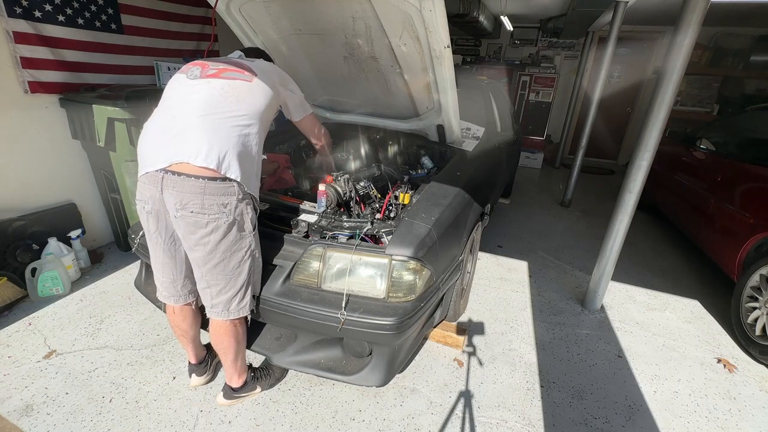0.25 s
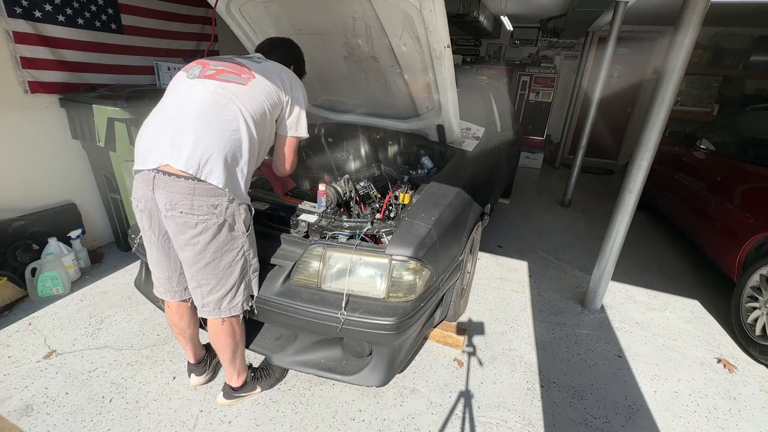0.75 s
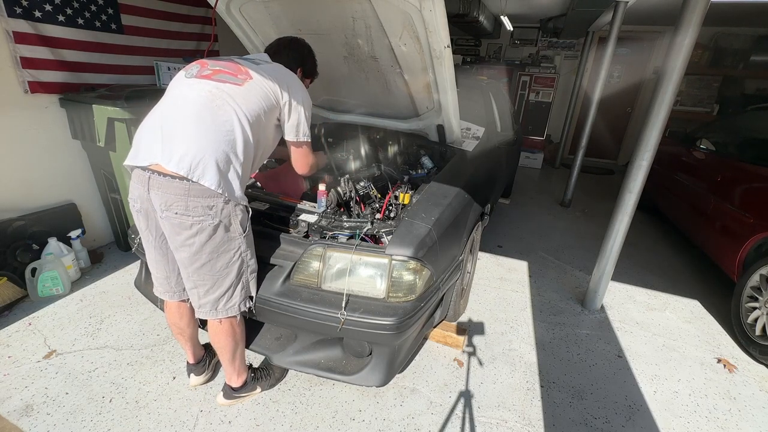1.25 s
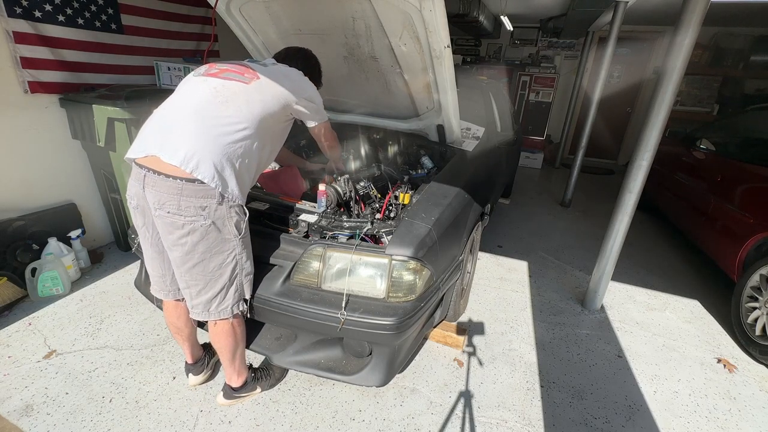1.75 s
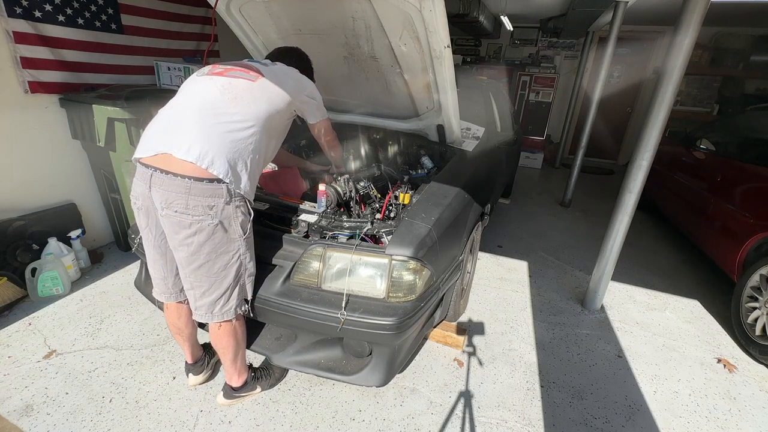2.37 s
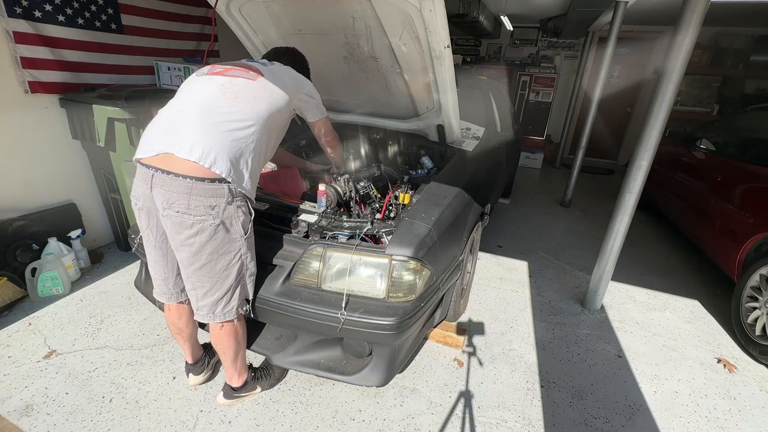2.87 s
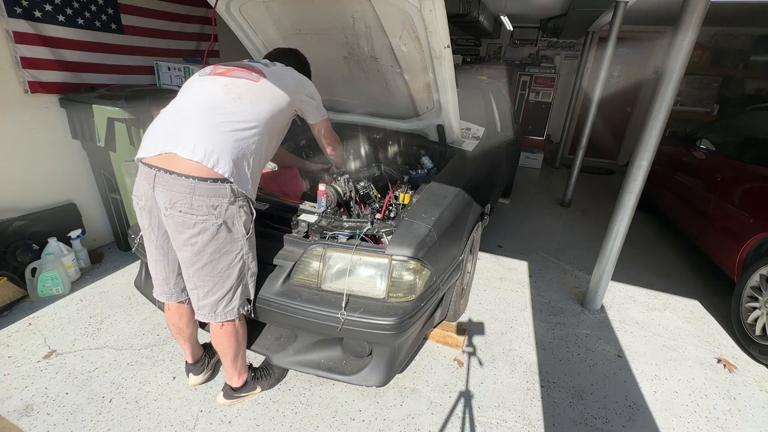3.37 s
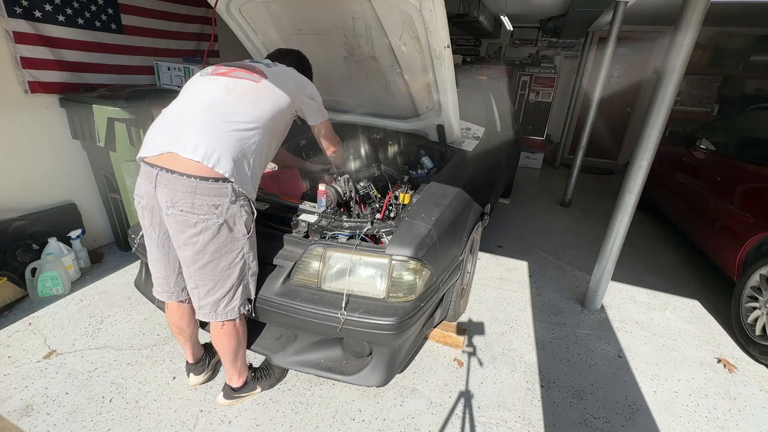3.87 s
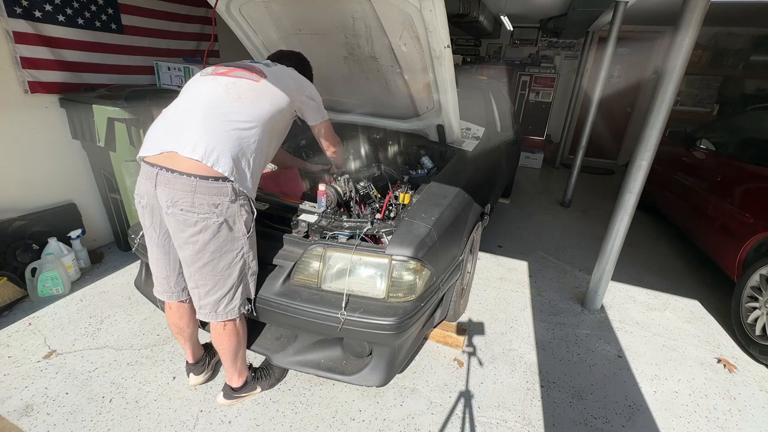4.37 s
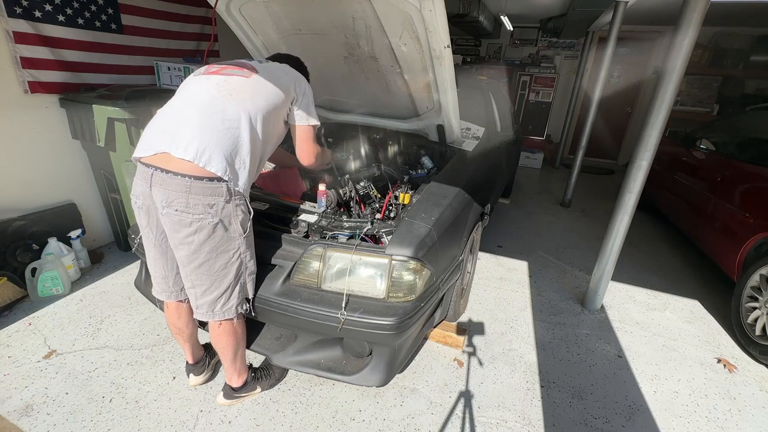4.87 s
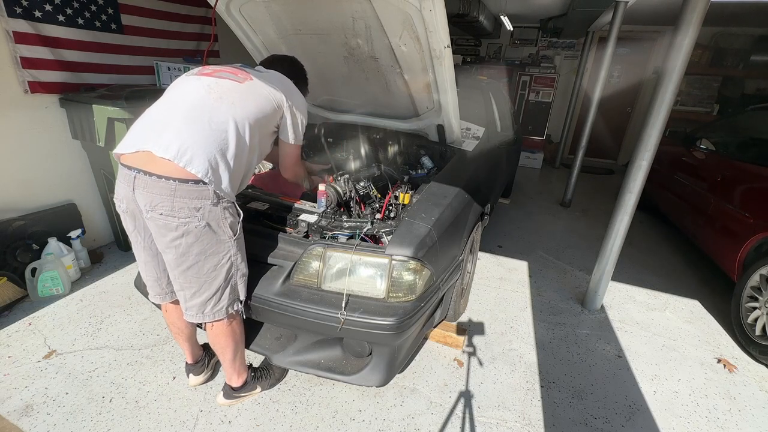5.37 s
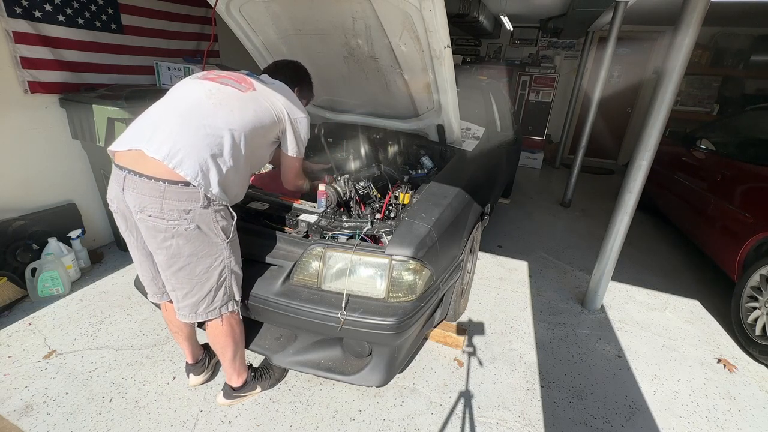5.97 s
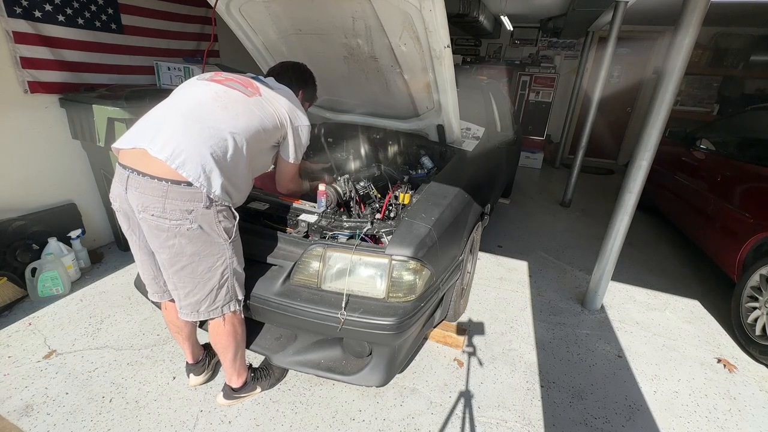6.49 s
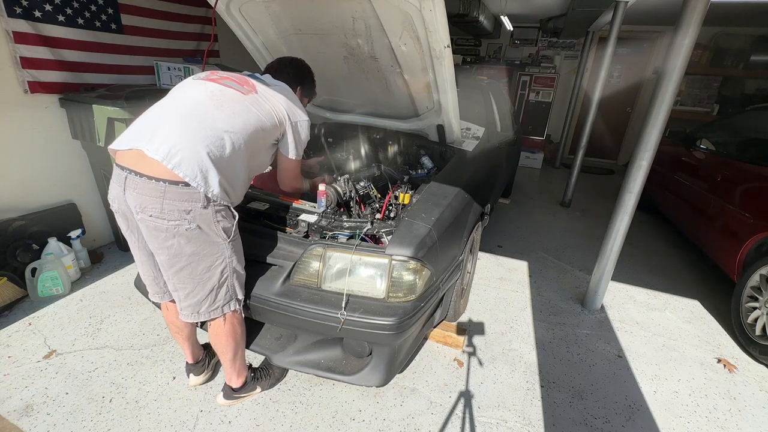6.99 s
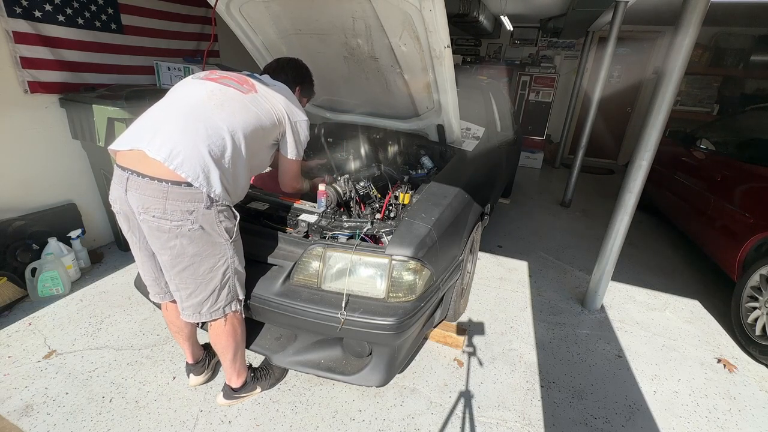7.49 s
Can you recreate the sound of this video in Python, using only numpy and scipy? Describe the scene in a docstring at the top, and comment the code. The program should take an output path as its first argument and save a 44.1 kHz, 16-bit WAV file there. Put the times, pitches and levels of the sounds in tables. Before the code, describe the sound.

A stereo microphone near an open engine bay picks up very quiet handling: small knocks, one brief rub, two dull thuds and a crisp snap. Faint whistling and buzzy birds echo outside over traffic rumble and high hiss, the hiss stronger on the left. After a lull, metal abruptly scrapes and bangs, ringing a housing and shaft, far louder than everything before, followed by low body boom and fading garage reverberation.

```python
"""First you hear town rumble, an insect-like hiss and far birds in echoes, from an open engine bay at a garage door.
A metal part is worked loose: small knocks, a rub, thuds on a fender and a snap; then it scrapes free and clatters.
Scrape and blows ring a metal housing and a steel shaft, and the car body booms along.
Knocks and snap are short puffs of noise, thuds are low rings, and the rub is a squeak shaken by noise.
Birds are gliding tones with echoes; rumble and hiss are shaped noise."""
import sys
import numpy as np
from scipy import signal
from scipy.fft import rfft, irfft, next_fast_len
from scipy.io import wavfile
from scipy.ndimage import uniform_filter1d, map_coordinates

SR = 44100
rng = np.random.default_rng(int(sys.argv[2]) if len(sys.argv) > 2 else 0)


def boost(x):
    """Linear amplitude factor 10**(x/20) for a level x in decibels (scalar or array-like)."""
    u = np.asarray(x, float) / 20
    return 10 ** u


def generate_wav(signal):
    """Clip the signal to [-1, 1] and save it as 16-bit WAV at the path in sys.argv[1]."""
    frames = np.transpose(np.atleast_2d(signal))
    scaled = np.clip(frames, -1, 1) * 32767
    pcm = np.round(scaled).astype(np.int16)
    wavfile.write(sys.argv[1], SR, pcm)


N = 341334  # length in samples


def unit(x):
    """Scales a sound to rms 1."""
    return x / np.sqrt(np.mean(x ** 2) + 1e-20)


def along(points, hz):
    """Reads a (pitch_hz, value) table at any pitch, on a log pitch axis."""
    point_hz, value = np.transpose(points)
    return np.interp(np.log(hz + 1), np.log(point_hz + 1), value)


def curves(rows):
    """Draws each column after the time as a curve over the scene, plus a gate open within the rows."""
    start_s, *columns = np.transpose(rows)
    t = np.arange(N) / SR
    gate = (t > start_s[0]) & (t < start_s[-1])
    return [np.interp(t, start_s, column) for column in columns] + [gate]


def wobble(rate):
    """A smooth random curve with this many random knots a second."""
    knots = rng.standard_normal(int(N * rate / SR) + 4)
    return map_coordinates(knots, [np.arange(N) * rate / SR])


def filtered(x, response):
    """Colours a sound by a response that is a function of frequency."""
    size = next_fast_len(x.shape[-1] + 8192)
    spectrum = rfft(x, size) * response(np.fft.rfftfreq(size, 1 / SR))
    return irfft(spectrum, size)[..., :x.shape[-1]]


def ringing(modes, damping):
    """Response of an object with several ringing pitches; damping widens each one, so it dies sooner."""
    def response(f):
        total = 0
        for k, (hz, width_hz, level_db) in enumerate(modes):
            loss = 1j * f * width_hz * damping
            total = total + (-1) ** k * boost(level_db) * loss / (hz * hz - f * f + loss)
        return total
    return response


def echo(x, decay, stretch):
    """Many blurred reflections per ear: noise tails that die at a speed set by pitch."""
    x = np.broadcast_to(x, (2, N))
    out = np.zeros((2, N + 2 * SR))
    step = SR // 4  # a fresh random tail every quarter second
    for i in range(0, N, step):
        noise = rng.standard_normal((2, int(stretch * SR) + 512))
        hz, t, z = signal.stft(noise, SR, nperseg=128)
        t60_s = stretch * along(decay, hz)[:, None]
        tail = signal.istft(z * boost(-60 * t / t60_s), SR, nperseg=128)[1]
        wet = signal.fftconvolve(x[:, i:i + step], tail / np.linalg.norm(tail[0]), axes=1)
        out[:, i:i + wet.shape[1]] += wet
    return out[:, :N]


# How the part scrapes free: start_s, level_db, brightness_db
SCRAPE_PATH = [(6.69, -65.5, 5.5), (6.714, -31, -14), (6.764, -24, -7.5), (6.798, -15.5, -4),
               (6.856, -17, -17.5), (6.866, -8.5, -9.5), (6.886, -10.5, -8.5), (6.898, -11.5, -13),
               (7.06, -52, -19)]
# Ringing pitches of the cast housing, widths before damping: pitch_hz, width_hz, level_db
HOUSING_MODES = [(480, 64, -9.5), (565, 52, -5.5), (660, 50, -4.5), (892, 100, -12.5), (1090, 120, -7.5),
                 (1198, 51, -11), (1230, 80.7, -7.5), (1418, 68, -2), (1450, 44, -1.5), (1510, 61, -3.5),
                 (1640, 46, -1), (1776, 120, -6.5), (1950, 63, -3.5), (2105, 81, -8.5), (2330, 170, -10.5),
                 (2520, 100, -12.5), (2600, 37, -6.5), (2810, 150, -15.5)]


def scrape():
    """Rubbing metal sticks and slips: random tiny shocks ring the housing and make bright contact noise."""
    level_db, bright_db, on = curves(SCRAPE_PATH)
    shocks = (rng.random(N) < .03) * rng.standard_normal(N)
    slips = unit(shocks * boost(3.7 * wobble(150))) * on
    housing = filtered(slips * boost(level_db + 6.5), ringing(HOUSING_MODES, damping=1.07))
    contact = slips * boost(level_db + bright_db + 9.5)
    return housing, contact


# Blows of the freed part; aim is the pitch struck hardest: start_s, level_db, brightness_db, aim_hz
BLOWS = [(6.705, -46, -16, 1280), (6.709, -41, -18, 1268), (6.72, -35, -15, 1400),
         (6.744, -34.5, -9.5, 1486), (6.753, -31, -2.5, 2024), (6.779, -14.5, -15.5, 1917),
         (6.791, -11, -17, 2400), (6.795, -6.5, -21, 1500), (6.805, -9.5, -7.5, 1480),
         (6.835, -22, -15, 1460), (6.845, -24, -11.5, 1470), (6.864, -2.5, -17.5, 1290),
         (6.875, -5, -13, 1450), (6.882, -7.5, -21, 1450), (6.89, -15, -23, 1403), (6.92, -19.5, -11, 1486),
         (6.932, -18.5, -15, 1640), (6.942, -19.5, -20.5, 1640), (7.082, -25, -37, 1550),
         (7.084, -24, -39, 1800), (7.091, -26, -34, 1700), (7.097, -22, -36.5, 1580)]


def blows():
    """Each blow rings the housing pitches near its aim, with a burst of noise; duller contacts last longer."""
    contact_s, softens, side_scatter_db = .00018, .4, 2.6  # contact time at brightness 0 dB
    housing, contact = np.zeros((2, N)), np.zeros((2, N))
    t = np.arange(SR // 8) / SR
    hz, width_hz, mode_db = np.transpose(HOUSING_MODES)[:, :, None]
    for start_s, level_db, bright_db, aim_hz in BLOWS:
        i = round(start_s * SR)
        # each blow leans to the left or right by chance
        sides = boost(level_db + rng.normal(0, side_scatter_db) * np.array([[.5], [-.5]]))
        off_aim_db = 12 * np.minimum(np.log2(hz / aim_hz) ** 2, 3.5)
        struck = boost(mode_db + rng.normal(0, 2.2, hz.shape) - off_aim_db)
        tones = np.sin(2 * np.pi * hz * t + rng.normal(0, 0.82, hz.shape))
        ring = (struck * np.exp(-np.pi * 1.4 * width_hz * t) * tones).sum(0)
        rise = 1 - np.exp(-(t / (contact_s * boost(-softens * bright_db))) ** 2)
        housing[:, i:i + len(t)] += sides * ring * rise
        burst = boost(bright_db + 15.0 - 60 * t / 0.025) * rng.standard_normal(len(t))
        contact[:, i:i + len(t)] += sides * burst
    return housing, contact


# Ringing pitches of the steel shaft and clamp, widths before damping: pitch_hz, width_hz, level_db
SHAFT_MODES = [(4450, 59, -8), (5330, 73, 6), (6600, 19, -7.5), (7400, 24, 4), (7980, 220, -12.5),
               (9350, 32, 5)]
# Tone of the bare contact noise: pitch_hz, level_db
CONTACT_TONE = [(1500, -6.5), (3000, -7), (5000, -7.5), (9500, -7), (12500, -4.5), (14500, -5),
                (16000, -10.5)]


def clatter():
    """The scrape and blows together: housing ring, bare contact noise and the shaft that noise sets ringing."""
    scrape_housing, scrape_contact = scrape()
    blow_housing, blow_contact = blows()
    # a small part radiates little bass
    housing = filtered(scrape_housing + blow_housing, lambda f: f ** 4 / (f ** 4 + 350 ** 4))
    shaft = ringing(SHAFT_MODES, damping=4.5)
    contact = filtered(scrape_contact + blow_contact,
                       lambda f: boost(along(CONTACT_TONE, f) - 2.5) + .5 * shaft(f))
    return housing + contact


# Low resonances of the car body, widths before damping: pitch_hz, width_hz, level_db
BODY_PANELS = [(40, 12, 0.5), (71, 12.6, 1.5), (130, 16, -3.5), (200, 7.3, -11), (249, 22, -2),
               (330, 14, -7.5), (439, 35, -5)]


def panels(shocks):
    """The car body takes the shocks and booms on, alike in both ears."""
    return filtered(shocks, ringing(BODY_PANELS, damping=0.68))


def boom():
    """The scraping shakes the car body with noise, and the shaking dies away slowly."""
    boom_db, boom_t60_s = 2.5, 0.79
    level_db, _, on = curves(SCRAPE_PATH)
    push = on * boost(level_db)
    fade = boost(-60 / (boom_t60_s * SR))
    shudder = push + 0.39 * signal.lfilter([1 - fade], [1, -fade], push)
    return panels(unit(rng.standard_normal(N)) * shudder * boost(boom_db))


# A hand drops on the hollow fender: start_s, level_db
HAND_DROPS = [(1.9, -37.5), (4.917, -38.5)]
# Ringing pitches of the fender; t60 is the time to fall 60 dB: pitch_hz, level_db, t60_s
FENDER_MODES = [(136.3, -3.5, .4), (169.7, -6, 0.31), (263, -7, 0.27), (344, -10.5, 0.14), (458, -10, .25),
                (517, -7, .2), (676, -6, 0.26), (836, -17, .15), (1060, -2, .076)]


def thuds():
    """The fender rings low for a moment under a dull puff of contact noise."""
    ring_db, puff_db = -8, -7
    out, t = np.zeros(N), np.arange(SR // 3) / SR
    hz, mode_db, t60_s = np.transpose(FENDER_MODES)[:, :, None]
    dull = lambda f: f / (f + 150) / (1 + (f / 1100) ** 4)
    for start_s, level_db in HAND_DROPS:
        i = round(start_s * SR)
        fading = boost(mode_db + rng.normal(0, 1.1, hz.shape) - 60 * t / t60_s)
        ring = (fading * np.sin(2 * np.pi * hz * t)).sum(0)
        puff = unit(filtered(rng.standard_normal(len(t)), dull)) * boost(-60 * t / 0.16)
        rise = 1 - np.exp(-t / 0.0017)
        out[i:i + len(t)] += boost(level_db) * (boost(ring_db) * ring + boost(puff_db) * puff) * rise
    return out


def puffs(contacts):
    """Each contact is a dying puff of noise around its own pitch; higher bands rise and die sooner."""
    out, t = np.zeros(N), np.arange(SR // 3) / SR
    for start_s, level_db, hz, spread, t60_s in contacts:
        i = round(start_s * SR)
        octave = np.array([[-1.5], [-.5], [.5], [1.5]]) * spread  # four bands around the pitch

        def bands(f):
            distance = np.log2((f + 1) / hz) - octave
            return np.exp(-.5 * octave ** 2 / spread ** 2 - distance ** 2 / (0.71 * spread) ** 2)
        puff = unit(filtered(rng.standard_normal(len(t)), bands))
        puff = puff * boost(-60 * t / (t60_s * 2 ** (-.55 * octave)))
        puff = puff * (1 - np.exp(-t * hz * 2 ** octave / 1.4))  # rises over a few cycles
        out[i:i + len(t)] += boost(level_db) * puff.sum(0)
    return out


# Small knocks and ticks of handling: start_s, level_db, pitch_hz, spread_octaves
HANDLING = [(0.237, -54, 8900, 1.1), (0.796, -59, 6750, 0.23), (1.48, -47, 2220, 0.29),
            (1.484, -55.5, 1930, 1.4), (1.553, -59, 1090, 1.5), (3.668, -60.5, 1020, 0.89),
            (3.969, -64, 696, 0.46), (3.99, -55.5, 330, .64), (4.074, -52.5, 1160, 0.36),
            (4.161, -64, 1080, 0.97), (4.27, -65, 1500, .88), (4.305, -58.5, 406, 1.2),
            (4.563, -54.5, 750, 1.26), (4.588, -57.5, 5950, 1.9), (4.805, -53, 700, 0.76),
            (5.682, -58, 1270, 0.34), (6.609, -62, 398, 0.53)]


def knocks():
    """A knock with a broader spread of pitches shakes more parts and lasts longer."""
    t60_s_per_octave = 0.17  # at the centre pitch
    return puffs([(*knock, t60_s_per_octave * knock[3]) for knock in HANDLING])


# A fastener snaps open: start_s, level_db, pitch_hz, spread_octaves
SNAP_CONTACTS = [(5.1526, -36, 1200, 1.4), (5.1534, -33, 2780, 1.23), (5.1584, -32, 3970, 0.35)]


def snap():
    """A few very short contacts in quick succession are heard as one snap."""
    return puffs([(*contact, 0.019) for contact in SNAP_CONTACTS])  # t60 in s at the centre pitch


# A hose or sleeve rubs along the bay: start_s, level_db, squeak_hz
RUB_PATH = [(.62, -84, 880), (.7, -62, 860), (.8, -58, 850), (.83, -51, 790), (.89, -48, 710),
            (.94, -53, 680), (1.07, -62, 720), (1.18, -85, 690)]


def rub():
    """Friction: an unsteady squeak that mostly falls, with a fixed noise band at 500 Hz and one at 1500 Hz."""
    low_db, hiss_peak_db, hiss_follows = -6.5, -54.5, 0.42  # the hiss swings less than the squeak
    level_db, hz, on = curves(RUB_PATH)
    t = np.arange(N) / SR

    def narrow(width_hz):
        return unit(filtered(rng.standard_normal(N), lambda f: 1 / (1 + (f / width_hz) ** 4)))
    turn = 2 * np.pi * np.cumsum(hz) / SR
    lower = narrow(width_hz=97) * np.sin(2 * np.pi * 500 * t)
    squeak = (1 + .45 * narrow(width_hz=60)) * np.sin(turn + .8 * narrow(width_hz=40))
    upper = narrow(width_hz=590) * np.sin(2 * np.pi * 1500 * t)
    hiss_db = hiss_peak_db + hiss_follows * (level_db - level_db.max())
    return on * (boost(level_db) * (squeak + boost(low_db) * lower) + boost(hiss_db) * upper)


# Far bird whistles: start_s, length_s, from_hz, to_hz, level_db
WHISTLE_NOTES = [(0.18, 0.26, 5000, 4880, -55), (0.373, 0.16, 5770, 5800, -58),
                 (0.398, .042, 3500, 2440, -57.5), (0.469, .068, 2600, 3210, -55.5),
                 (0.616, 0.27, 2637, 2985, -57.5), (1.317, 0.18, 5040, 4940, -62),
                 (1.578, 0.064, 3200, 2600, -59), (1.629, 0.03, 2600, 3300, -59),
                 (1.657, 0.052, 3280, 2410, -55), (1.75, 0.055, 2680, 4100, -62),
                 (2.746, 0.11, 5300, 4740, -63), (2.801, .063, 4110, 3700, -59.5),
                 (2.862, 0.036, 3600, 2480, -57.5), (2.896, .055, 3250, 2860, -62),
                 (3.55, 0.18, 5420, 5370, -57), (3.773, .21, 4320, 4330, -58.5),
                 (4.193, 0.07, 3280, 2600, -56), (4.602, 0.051, 3020, 2670, -51),
                 (4.964, .14, 4600, 4620, -59.5), (5.198, .13, 3140, 2924, -54.5),
                 (5.596, 0.081, 3190, 2136, -53.5), (5.689, 0.095, 2283, 2600, -56),
                 (5.781, 0.084, 3076, 2810, -54.5), (6.11, .054, 3740, 3860, -62),
                 (7.191, 0.069, 4895, 4660, -62), (7.385, 0.18, 3370, 2470, -61),
                 (7.636, .047, 3300, 2408, -61), (7.688, 0.038, 2430, 3320, -59.5)]
# Far buzzy bird notes: start_s, length_s, from_hz, to_hz, level_db
BUZZY_NOTES = [(0.212, 0.32, 4635, 4510, -54.5), (0.546, 0.36, 3460, 3360, -53),
               (1.831, 0.35, 3866, 3660, -53.5), (3.62, .083, 4900, 4760, -59),
               (3.73, 0.31, 3452, 3138, -52.5), (4.658, .19, 3333, 2796, -51),
               (4.999, 0.42, 3790, 3540, -53), (6.125, 0.16, 3380, 2743, -53.5)]
# How long the birds' echoes last, before stretching: pitch_hz, t60_s
TREE_ECHO = [(2500, 1), (5500, 0.25)]


def birds():
    """Gliding tones with an uneven warble, strong enough in some to become a buzz, heard with long echoes."""
    whistle_warble_hz, buzz_warble_hz_per_s = 50.4, 1900  # longer buzzes spread wider
    song, flutter = np.zeros(N), wobble(220)
    notes = [(*note, whistle_warble_hz) for note in WHISTLE_NOTES]
    notes += [(*note, buzz_warble_hz_per_s * note[1]) for note in BUZZY_NOTES]
    for start_s, length_s, from_hz, to_hz, level_db, warble_hz in notes:
        i = round(start_s * SR)
        u = np.linspace(0, 1, int(length_s * SR))
        hz = from_hz + (to_hz - from_hz) * u + warble_hz * flutter[i:i + len(u)]
        shape = np.abs(np.sin(np.pi * u ** 0.79)) ** 0.28
        song[i:i + len(u)] += boost(level_db) * shape * np.sin(2 * np.pi * np.cumsum(hz) / SR)
    heard = 0.52 * song + 0.85 * echo(song, TREE_ECHO, stretch=.8)
    return boost([[1.8], [-1.8]]) * heard  # dB left, right


# How alike left and right are, from 1 (same) to -1 (opposite): pitch_hz, likeness
EAR_LIKENESS = [(60, .9), (130, 0.9), (290, -0.052), (640, -0.3), (3000, 0.27), (15000, -0.32)]


def rush(spectrum, patchy_db):
    """Wide stereo noise of rms 1, made lumpy by random patches of louder and softer gain."""
    z = signal.stft(rng.standard_normal((2, N + 512)), nperseg=512)[2]
    field = uniform_filter1d(rng.standard_normal(z.shape[1:]), 6, 0)
    field = uniform_filter1d(field, 14, 1)
    pair = signal.istft(z * boost(patchy_db * unit(field)), nperseg=512)[1][:, :N]

    def mid_side(hz):
        turn = np.arccos(np.clip(along(EAR_LIKENESS, hz), -1, 1)) / 2
        return boost(along(spectrum, hz)) * [np.cos(turn), np.sin(turn)]
    mid, side = filtered(pair, mid_side)
    return unit(np.array([mid + side, mid - side]))


# Tone of far traffic and air, relative dB per Hz: pitch_hz, level_db
TOWN_TONE = [(12, -52.5), (20, -18), (80, -0.5), (180, -16), (457, -22), (498, -22), (568, -21.5),
             (647, -24.5), (1210, -25), (3600, -28.5), (4680, -64.5), (7920, -120)]
# Tone of the insect-like hiss, relative dB per Hz: pitch_hz, level_db
HISS_TONE = [(2500, -47.5), (3800, -6.5), (4800, -1.5), (6000, 4), (7500, 3.5), (8800, -6), (10000, -21),
             (12500, -26.5), (16000, -24.5)]
# How the town rumble swells: start_s, level_db
TOWN_SWELL = [(0, -55), (1.1, -53.5), (1.4, -53), (3.3, -55), (4.2, -52.5), (4.6, -56.5), (5.0, -54),
              (5.5, -55.5), (7.7, -54)]
# The open door lies to the left: pitch_hz, left_minus_right_db
DOOR_LEAN = [(60, 1), (180, 1.5), (550, 2), (1650, 3), (4970, 13), (15000, 16.5)]


def outdoors():
    """Rumble comes in lumps; the high hiss buzzes faintly about sixty times a second."""
    hiss_db = -62.5
    town_db, _ = curves(TOWN_SWELL)
    buzz = 1 + .3 * np.exp(9 * np.cos(2 * np.pi * 59.9 * np.arange(N) / SR) - 9)
    town = boost(town_db) * rush(TOWN_TONE, patchy_db=2.5)
    hiss = boost(hiss_db + .3 * wobble(2.7)) * unit(buzz * rush(HISS_TONE, patchy_db=1.3))
    return filtered(town + hiss, lambda hz: boost(np.array([[.5], [-.5]]) * along(DOOR_LEAN, hz)))


# How long echoes last in bay and garage, before stretching: pitch_hz, t60_s
GARAGE_ECHO = [(100, 1), (500, 0.83), (1500, 0.33), (3000, 0.4), (5000, 0.37), (10000, 0.31)]


def placed(x, bay_db, garage_db):
    """Direct sound reaches the left first; hood and block scatter it at once, the garage later."""
    direct = np.array([x[0], np.roll(x[1], 20)])  # delays in samples
    bay = echo(x, GARAGE_ECHO, stretch=.07)
    garage = np.roll(echo(x, GARAGE_ECHO, stretch=0.94), 500, axis=1)
    return direct + boost(bay_db) * bay + boost(garage_db) * garage


def scene():
    """Work in the bay, the handling a little to the left, over birds and the outdoor background."""
    thud = thuds()
    hands = boost([[1.2], [-1.2]]) * (knocks() + snap() + thud + rub())  # dB left, right
    part = placed(clatter(), bay_db=4, garage_db=-5.5) + boom()
    handling = placed(hands, bay_db=0, garage_db=-5.5) + boost(-4) * panels(thud)
    return part + handling + birds() + outdoors()


def band_limit(x):
    """A steep low-pass at the top of the band."""
    return signal.sosfilt(signal.butter(12, 15900, fs=SR, output="sos"), x)


# One treble band is nearly empty, and the top is missing: pitch_hz, level_db
TREBLE_GAPS = [(9600, 0), (10500, -8), (10800, -32), (11900, -32), (12200, -2), (15700, -2), (16000, -60)]


def record(dry):
    """A filter thins out one treble band and the top, and peaks are cut off flat at full scale."""
    thinned = filtered(dry, lambda hz: boost(along(TREBLE_GAPS, hz)))
    mix = np.clip(thinned, -1, 1)
    return band_limit(mix)


dry = scene()
out = record(dry)
generate_wav(out)
```